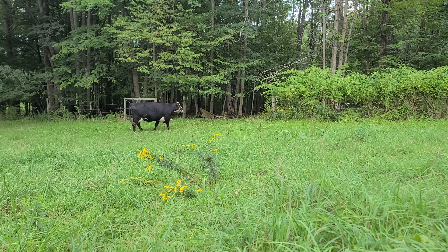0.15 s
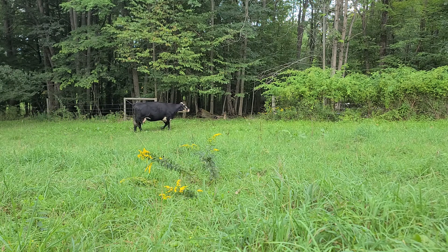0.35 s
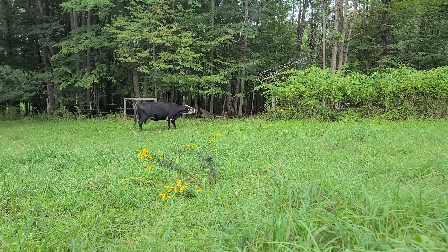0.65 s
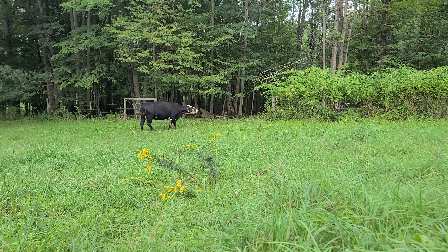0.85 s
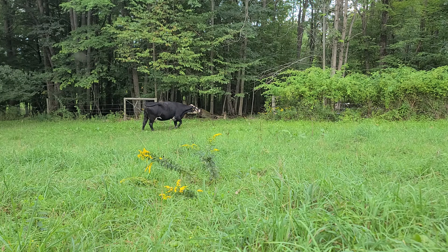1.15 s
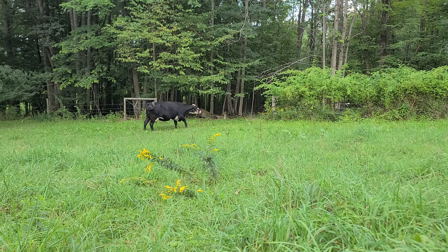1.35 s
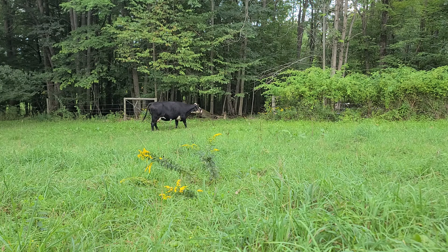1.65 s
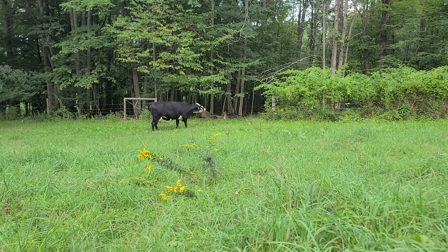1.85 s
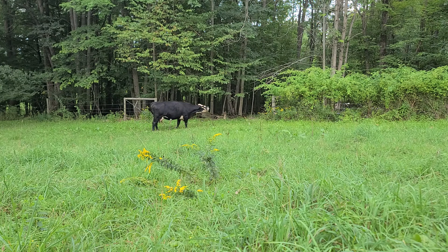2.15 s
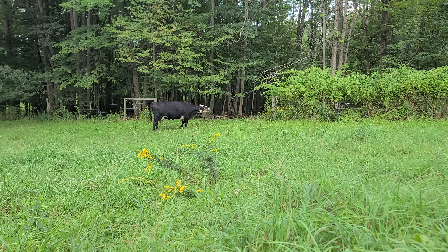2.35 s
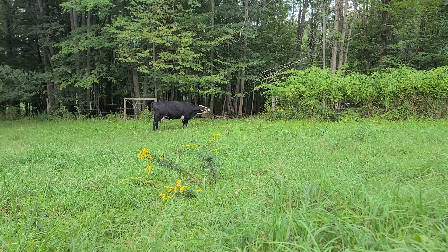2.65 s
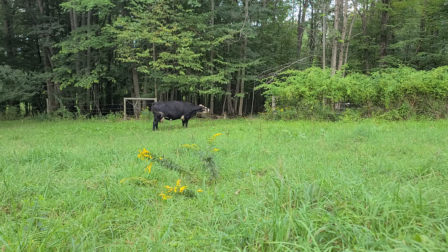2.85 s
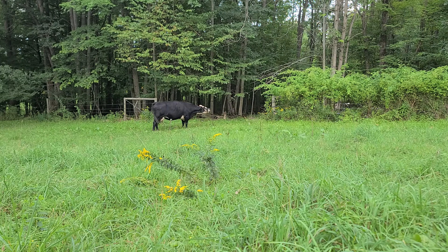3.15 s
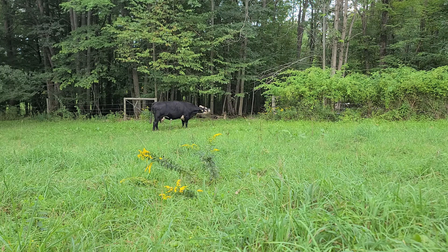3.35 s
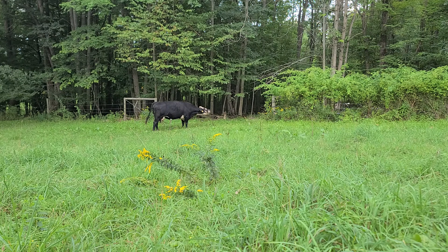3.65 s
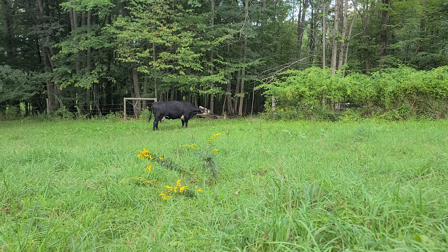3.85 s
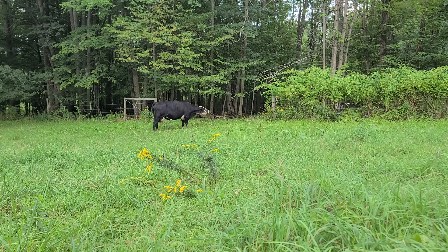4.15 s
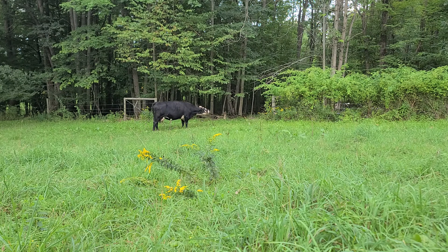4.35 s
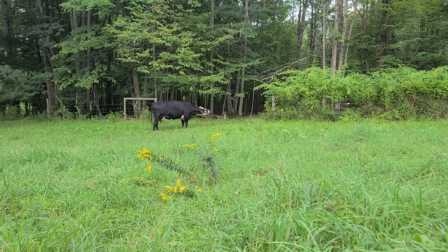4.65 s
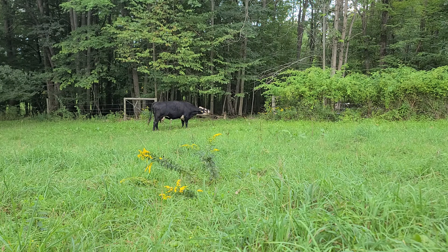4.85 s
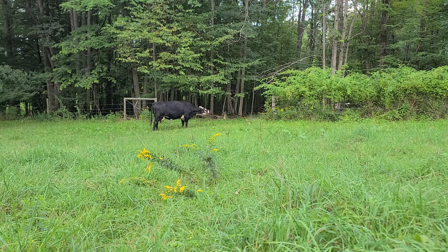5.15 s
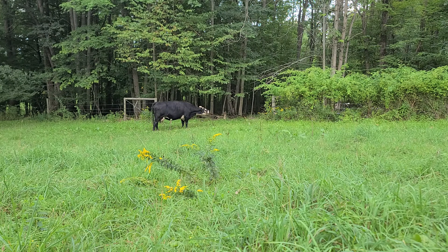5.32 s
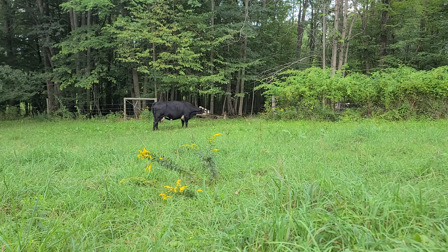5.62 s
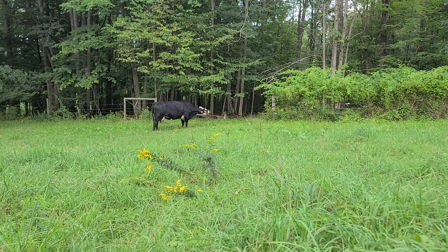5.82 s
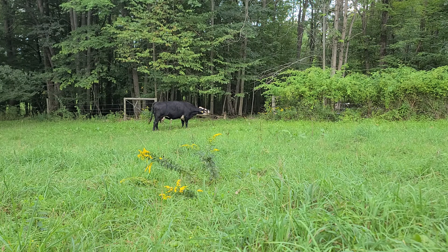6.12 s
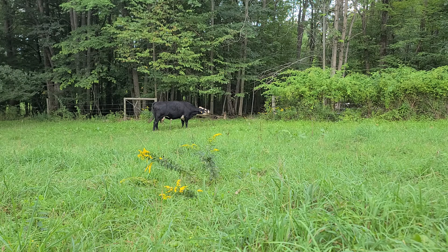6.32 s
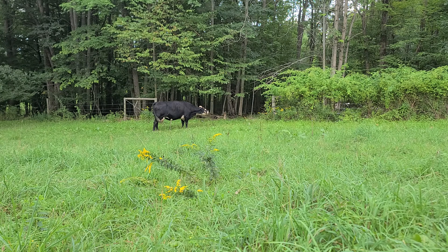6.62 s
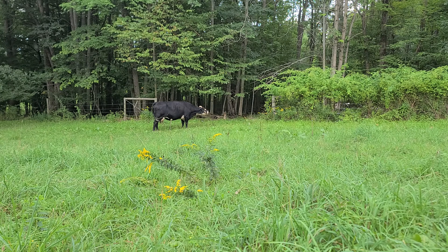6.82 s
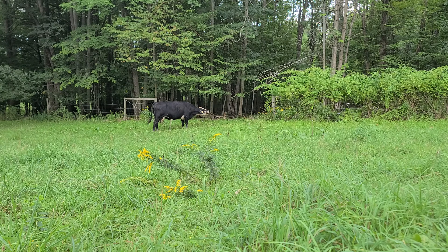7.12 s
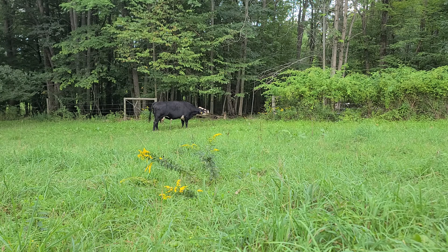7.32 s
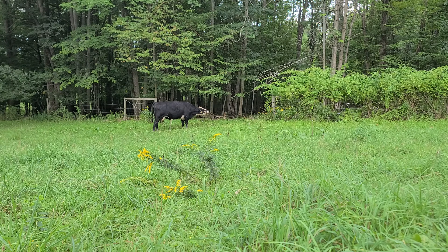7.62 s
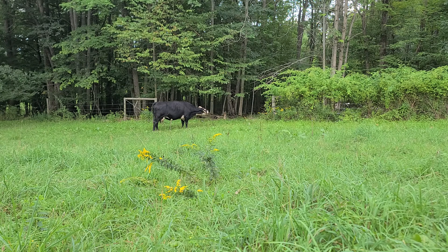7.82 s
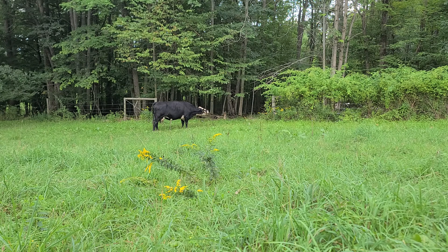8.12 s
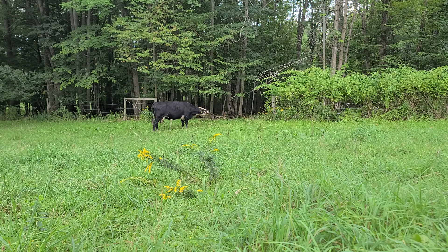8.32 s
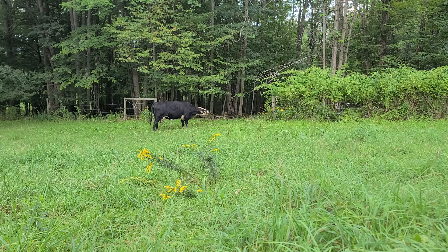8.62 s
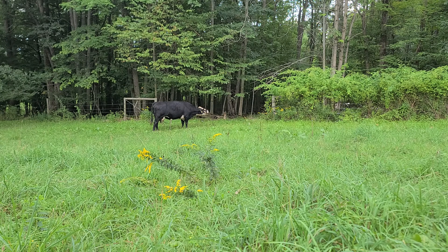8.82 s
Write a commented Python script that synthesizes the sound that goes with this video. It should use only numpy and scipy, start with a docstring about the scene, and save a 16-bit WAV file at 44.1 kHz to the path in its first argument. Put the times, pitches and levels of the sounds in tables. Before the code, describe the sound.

A cow bellows loudly again and again across a pasture, each moo rising then dropping, a second cow answering, woodland echo and insects behind.

```python
"""Pasture at the edge of a wood, stereo microphone: a cow lows from the first moment, seven calls in all.
A second cow, further left, answers across the first call and again from the fifth second.
A thin treble tone wavers twice early on; the trunks scatter every bellow back as a long echo.
A katydid to the right ticks in three bouts from the start; crickets chirp on the same side, louder right.
Far insects, a low murmur of air and wind on the microphone ports lie beneath; all are shaped noise."""
import sys
import numpy as np
from scipy import signal
from scipy.fft import rfft, irfft, next_fast_len
from scipy.io import wavfile
from scipy.ndimage import uniform_filter1d, map_coordinates

SR = 44100
rng = np.random.default_rng(int(sys.argv[2]) if len(sys.argv) > 2 else 0)


def int16_out(signal):
    """Quantize to a 16-bit WAV file."""
    q = np.round(np.clip(np.atleast_2d(signal).T, -1, 1) * 32767)
    wavfile.write(sys.argv[1], SR, q.astype(np.int16))


N = 395577


def amp(db):
    """Gain of a level in dB."""
    return 10 ** (np.asarray(db) / 20)


def unit(x):
    """x at rms 1."""
    return x / np.sqrt(np.mean(x ** 2) + 1e-20)


def along(points, hz):
    """Values at hz, read from (frequency, value) points on a log frequency axis."""
    f, v = np.transpose(points)
    return np.interp(np.log(hz + 1), np.log(f + 1), v)


def played(rows):
    """First sample, then one value per sample for each column while the table lasts."""
    seconds, *columns = np.transpose(rows)
    n = np.arange(round(seconds[0] * SR), min(round(seconds[-1] * SR), N))
    return n[0], [np.interp(n / SR, seconds, column) for column in columns]


def wobble(rate, size, count=1):
    """Smooth random curves with rate knots a second."""
    knots = rng.standard_normal((count, int(size * rate / SR) + 4))
    position = np.arange(size) * rate / SR
    return np.array([map_coordinates(k, [position]) for k in knots])


def filtered(x, response):
    """x times a response of frequency."""
    m = next_fast_len(N + SR)
    hz = np.fft.rfftfreq(m, 1 / SR)
    return irfft(rfft(x, m) * response(hz), m)[..., :N]


def paired(two, alike):
    """Two unrelated signals mixed to a left-right correlation that may vary with frequency."""
    def turn(hz):
        return np.arccos(np.clip(along(alike, hz), -1, 1)) / 2

    mid, side = filtered(two, lambda hz: np.array([np.cos(turn(hz)), np.sin(turn(hz))]))
    return np.array([mid + side, mid - side])


def hiss(spectrum, alike):
    """Stereo noise of rms 1 with a given spectrum and left-right correlation."""
    noise = filtered(rng.standard_normal((2, N)), lambda hz: amp(along(spectrum, hz)))
    return unit(paired(noise, [(100, alike)]))


# Spectrum of the still air over the pasture: (frequency [Hz], relative density [dB per Hz])
AIR_SPECTRUM = [(40, -28.5), (70, -0.5), (120, -8), (240, 4), (420, -8.5), (650, -20), (1300, -25),
                (1700, -16), (2200, -25), (3200, -35.5), (5000, -91.5)]


def air():
    """The open air is a steady low noise, nearly alike at both ports."""
    return amp(-52.0) * hiss(AIR_SPECTRUM, alike=.85)


# Spectrum of the wind on the microphone ports: (frequency [Hz], relative density [dB per Hz])
WIND_SPECTRUM = [(15, -13), (30, -7.5), (50, 1.5), (70, -16), (150, -88.5)]
GUST_DB, GUST_SWING_DB = -72, 5  # middle level; size of the slow swing


def wind():
    """Wind buffets the ports as a deep rumble that swings slowly and, less, quickly."""
    gusts = amp(GUST_DB + GUST_SWING_DB * wobble(2.5, N) + 3 * wobble(7.2, N))
    return gusts * hiss(WIND_SPECTRUM, alike=.96)


# Spectrum of the far insects: (frequency [Hz], relative density [dB per Hz])
CHORUS_SPECTRUM = [(1880, -30.5), (3200, -11.5), (3440, -10), (3750, -5.5), (4490, -13), (5990, 1.5),
                   (6840, -42.5), (7120, -11), (7610, -3), (8460, 7), (10300, -10), (11300, -3.5),
                   (12800, -5), (14000, -11.5), (15700, -18)]


def far_insects():
    """Many distant insects blur into a wide noise that swells a little."""
    return amp(-67.5 + 0.74 * wobble(3.6, N)) * hiss(CHORUS_SPECTRUM, alike=0)


# Chirps of the nearest crickets: (time [s], right-hand peak level before pulse variation [dB], tone [Hz])
CRICKET_CHIRPS = [(0.394, -61, 8500), (0.6165, -57, 9170), (0.937, -55, 8980), (1.076, -62, 8620),
                  (1.3266, -56, 8700), (1.4666, -61, 8630), (1.5965, -60, 8550), (1.8791, -61, 8790),
                  (2.1789, -63, 8150), (2.8504, -60, 8670), (3.6127, -64, 8670), (4.6463, -57, 8740),
                  (4.7482, -55, 8680), (4.8617, -58, 8190), (5.0245, -55, 8780), (5.8438, -64.5, 8800),
                  (6.133, -63, 8300), (6.2736, -64, 8700), (6.4483, -57, 8280), (6.7351, -58, 8300),
                  (7.0369, -60, 8720), (7.125, -57, 8260), (7.3397, -69, 8740), (7.4664, -56, 8370),
                  (7.8462, -57, 8380), (8.27, -60, 8370), (8.5545, -52.5, 8330), (8.822, -56, 8920)]


def crickets():
    """Each chirp is six short pulses on one wing tone, the pulses uneven in level."""
    out = np.zeros(N + SR)
    t = np.arange(round(.06 * SR)) / SR
    pulses = np.sin(np.pi * 100 * t) ** 4  # one every 10 ms
    for s, db, hz in CRICKET_CHIRPS:
        uneven = np.repeat(amp(rng.normal(0, 2, 6)), 441)
        out[round(s * SR):][:len(t)] += amp(db) * pulses * np.sin(2 * np.pi * hz * t) * uneven
    return out[:N] * np.array([[.3], [1]])  # louder on the right


# Katydid bouts, each a list of (time [s], wing strokes [per s], rms level [dB])
KATYDID_BOUTS = [
    [(0, 36.6, -58.5), (.8, 36.6, -57.5), (1.3, 36.2, -58), (1.675, 35.8, -57)],
    [(2.3635, 37.9, -58.5), (2.7, 37.8, -58), (3.4, 37.2, -59.5), (4, 36.6, -57), (5, 36.5, -57.5),
     (5.83, 31, -60)],
    [(6.4325, 37.9, -58), (6.8, 37.8, -58), (7.2, 35, -58.5), (7.8, 36.7, -59), (8.97, 36.6, -57)],
]
# Lone ticks: (time [s], level before a 2.5 dB lift [dB])
LONE_TICKS = [(1.8771, -48.5), (1.8976, -50.5), (2.2995, -53.5), (2.3123, -52), (6.0783, -49.5),
              (6.1049, -53), (6.563, -44.5)]
# Spectrum of the wing noise: (frequency [Hz], relative density [dB per Hz])
WING_SPECTRUM = [(6470, -41.5), (11000, -14.5), (11900, -3.5), (12900, 5), (13700, 3), (15100, 2),
                 (15700, -26.5)]


def katydid():
    """Each wing stroke is a soft buzz of noise that ends in a sharp tick."""
    envelope = np.zeros(N)
    for rows in KATYDID_BOUTS:
        start, (rate, db) = played(rows)
        size = len(db)
        cycle = (np.cumsum(rate) / SR + .7) % 1
        tick = np.exp(-((cycle - .9) / .04) ** 2)
        tick = tick * amp(1.5 * wobble(30, size)[0])
        buzz = .17 + .1 * np.sin(np.pi * np.clip(cycle / .9, 0, 1)) ** 2
        envelope[start:start + size] = amp(db) * unit(tick + buzz)
    for s, db in LONE_TICKS:
        envelope += amp(db + 2.5) * np.exp(-((np.arange(N) / SR - s) / .001) ** 2)
    sound = envelope * hiss(WING_SPECTRUM, alike=.85)
    late = np.array([[3.3e-4], [0]])  # s; it reaches the left port later, so it sits to the right
    return filtered(sound, lambda hz: np.exp(-2j * np.pi * hz * late))


# Decay of the trunks' echo: (frequency [Hz], time to fall 60 dB [s])
WOOD_DECAY = [(150, 1.51), (500, 0.64), (900, 1.56), (1500, 0.61), (3000, 0.55), (8000, 0.65)]
# Strength of the echo: (frequency [Hz], level re direct sound [dB])
WOOD_LEVEL = [(100, -14), (300, -12), (600, -7.5), (1000, -1), (3000, -1.5), (6000, -5)]
# Left-right likeness of the echo: (frequency [Hz], correlation [0 to 1])
WOOD_LIKENESS = [(150, .5), (500, .2), (1000, 0), (4000, 0)]


def wood(x):
    """Trunks at many distances scatter the sound; each frequency dies at its own speed."""
    hz, t, grains = signal.stft(rng.standard_normal((2, 2 * SR)), SR, nperseg=256)
    decay = amp(-60 * t / along(WOOD_DECAY, hz)[:, None])
    fall = decay * (1 - np.exp(-t / .015))  # the echo builds up over some 15 ms
    fall /= np.linalg.norm(fall, axis=1, keepdims=True)
    tail = signal.istft(grains * fall, SR, nperseg=256)[1]
    tail = tail / np.linalg.norm(tail[0])
    scattered = signal.fftconvolve(x[None], tail, axes=1)[:, :N]
    echo = paired(scattered, WOOD_LIKENESS)
    return filtered(echo, lambda hz: amp(along(WOOD_LEVEL, hz)))


# Thin treble tone, each sounding a list of (time [s], middle pitch [Hz], level before flutter and chop [dB])
WHISTLE_TONES = [
    [(.425, 4170, -81.5), (.48, 4350, -71.5), (.57, 4400, -68), (.62, 4350, -78.5)],
    [(1.03, 3900, -63.5), (1.156, 4000, -60.5), (1.168, 3980, -74.5), (1.176, 3930, -63.5),
     (1.24, 4000, -79.5)],
]


def whistle():
    """A narrow tone unsteady in pitch and level, lightly chopped about 135 times a second."""
    out = np.zeros(N)
    for rows in WHISTLE_TONES:
        start, (hz, db) = played(rows)
        size = len(hz)
        chop_hz = 135 + 15 * wobble(7.2, size)[0]
        chop = 1 + 0.43 * np.cos(2 * np.pi * np.cumsum(chop_hz) / SR)
        tone = np.sin(2 * np.pi * np.cumsum(hz + 60 * wobble(85, size)[0]) / SR)
        flutter = amp(2.5 * wobble(25, size)[0]) * signal.windows.tukey(size, .2)
        out[start:start + size] = amp(db) * flutter * chop * tone
    return out


# Calls of the first cow and of the second, each call a list of
# (time [s], pitch [Hz], reference level [dB], mouth opening [0 shut, 1 open, more gaping])
COW_CALLS = [
    [(.08, 68.1, -59, .1), (.13, 71.03, -41.5, 0), (.288, 86.9, -30.5, 0.38), (.33, 111.5, -30, 0),
     (.4, 112, -30, 0.14), (.52, 127.5, -28.5, 0.21), (.55, 135.3, -26, 0.97), (.63, 150.9, -22.5, 1.13),
     (.788, 165.7, -21, 1.046), (.97, 171.7, -18, 0.93), (1.01, 160.6, -16.5, 1.14),
     (1.044, 123.7, -25, 1.5), (1.08, 77.8, -41, 1.3)],
    [(1.7, 66.37, -40.5, 1), (1.774, 89.93, -29, 1), (1.822, 104, -26, 1), (1.938, 129.3, -25, .9),
     (2.02, 148.6, -23, 1.18), (2.13, 159.6, -23, 1.045), (2.27, 169.2, -18, 0.93),
     (2.344, 177.6, -22, 1.12), (2.45, 183.2, -19, 1.045), (2.6, 186.3, -18.5, 0.98),
     (2.636, 172.3, -17, 1.28), (2.69, 87.1, -34.5, 2)],
    [(3.04, 77.4, -48.5, .6), (3.102, 109.2, -31.5, 1.1), (3.174, 140, -22, 0.89),
     (3.238, 151.1, -24, 1.044), (3.428, 169, -18.5, 0.95), (3.55, 178.5, -19, 1.02),
     (3.66, 183.1, -18.5, 0.99), (3.75, 184, -18.5, .9), (3.84, 179.7, -19.5, 1), (3.876, 177, -19.5, 1.37),
     (3.9, 152.1, -18.5, 1.44), (3.955, 88.8, -35, 1.7)],
    [(4.27, 79.1, -58.5, 0.9), (4.322, 102.4, -30.5, 1), (4.402, 139, -23, 0.91), (4.488, 155, -22, 0.88),
     (4.618, 171, -18.5, 0.97), (4.74, 178.6, -18.5, 1.06), (4.858, 184.1, -18, 1),
     (4.92, 184.1, -16.5, 0.91), (4.995, 180, -18, 1.08), (5.018, 175.4, -21.5, 1.39),
     (5.042, 151.3, -17, 1.24), (5.095, 91, -34.5, 1.6)],
    [(5.49, 73, -51.5, 1.1), (5.53, 87.1, -33, 0.97), (5.596, 112.8, -30, 1), (5.67, 132.2, -24, 0.95),
     (5.874, 159.3, -21.5, 0.92), (5.948, 163.8, -22.5, 1.106), (6.02, 173.2, -18, 0.97),
     (6.274, 176.6, -17.5, 1.036), (6.304, 171.5, -16.5, 0.89), (6.334, 158, -20, 0.98),
     (6.41, 91, -31.5, 1.8)],
    [(6.85, 70.2, -45, 0.89), (6.888, 89.8, -33, 1), (6.936, 108.9, -29.5, 0.97), (7.018, 135.3, -24, 0.95),
     (7.09, 147.6, -24, 0.93), (7.3, 169.1, -20.5, 1.04), (7.364, 177.8, -17.5, 1.06),
     (7.53, 173.6, -18.5, 0.97), (7.552, 166.9, -20.5, 1.2), (7.584, 136.6, -20.5, 1.2),
     (7.64, 77.7, -42.5, 2)],
    [(7.985, 71.9, -46, 1.1), (8.036, 97.45, -30, 1), (8.106, 125.6, -26, .9), (8.194, 139.9, -22.5, 0.87),
     (8.296, 155, -22.5, 0.97), (8.426, 164.9, -20.5, 0.99), (8.5, 175.4, -18, 1.02),
     (8.612, 177.2, -19, 1.15), (8.722, 175, -18, 1.01), (8.775, 157.4, -19.5, 1.06),
     (8.855, 83.4, -33, 1.5)],
]
ANSWER_CALLS = [
    [(.44, 63.14, -40.5, .3), (.59, 86.3, -35.5, .9), (.7, 110.3, -30, .9), (.8, 138.1, -29.5, 0.97),
     (.88, 148.4, -25.5, 0.84), (1.0, 155.9, -32, 1), (1.09, 162.1, -24, 1), (1.16, 174.6, -22.5, 1),
     (1.24, 177.1, -24.5, 1), (1.4, 180.5, -22, 1), (1.58, 181.7, -20.5, 0.89), (1.72, 180.6, -22, 1),
     (1.766, 158, -21, 1), (1.85, 93.1, -39.5, 1)],
    [(4.84, 68, -60, 0.28), (4.94, 84.6, -43.5, 0.43), (5.1, 88.64, -47, 0.71), (5.2, 108.8, -38, 0.98),
     (5.3, 133.3, -32.5, 0.53), (5.4, 157.4, -30.5, 0.47), (5.6, 186.4, -27.5, 0.64),
     (5.7, 190.5, -24, 0.73), (5.95, 194.7, -23.5, 0.35), (6.3, 191.8, -24.5, 0.36), (6.38, 181, -20, 0.55),
     (6.48, 102.3, -40.5, 0.82)],
]
# Throat resonances that colour the high partials: (frequency [Hz], relative gain [dB])
COW_THROAT = [(300, -16), (600, -5), (720, -0.5), (880, 4.5), (1090, 4), (1230, -5.5), (1400, -2.5),
              (1600, -12), (1850, -6.5), (2080, -26), (2400, -15.5), (2900, -20), (3150, -51.5),
              (4000, -49.5), (4600, -47), (5300, -56.5), (7000, -100)]
ANSWER_THROAT_GAIN = [(350, -43), (600, -10), (709, -14.5), (1100, 1), (1280, -8), (1490, -10),
                      (1690, -15.5), (2040, -21.5), (2390, -28), (2740, -34), (3240, -48.5), (4160, -44),
                      (5500, -57), (7150, -85), (12100, -120)]
# What the open mouth does to the four lowest partials: (frequency [Hz], gain [dB])
COW_MOUTH = [(70, -4.5), (106, -7), (121, -20.5), (136, -14.5), (150, -8), (180, 0.16), (215, 3),
             (265, 3.6), (300, -2.5), (330, -3), (355, -0.23), (400, -1.5), (440, -4), (500, 3), (524, -4),
             (548, -6.5), (600, -12), (660, -23.5), (730, -23.5)]
ANSWER_MOUTH_GAIN = [(70, -6), (110, -17), (140, -11), (165, -2.5), (190, 0.5), (225, 7.5), (280, 5.5),
                     (320, -8.5), (360, -0.5), (440, -4.5), (490, 4.5), (545, -3.5), (600, -17.5),
                     (730, -19.5)]
# Partials 1 to 4: (level re reference before the mouth's gain [dB], loss with the mouth shut [dB])
COW_LOW = [(1, -1.5), (-1.5, 9.5), (-3, 12.5), (-8.5, 12)]
ANSWER_LOW_PARTIALS = [(1, 0.5), (-4.5, 7), (-3.5, 41.5), (-9.5, 31)]
# Throat bands against pitch, before a common 0.5 dB lift:
# (pitch [Hz], low band re reference [dB], middle band [dB], top band [dB])
COW_BRIGHT = [(80, -12.5, -24.5, -51), (100.1, -17, -33.5, -60.5), (129, -20, -52.5, -61.5),
              (156.7, -16.5, -31.5, -59), (166.5, -15, -26, -52.5), (177.2, -19, -33.5, -59.5),
              (187, -21, -34, -53)]
ANSWER_BRIGHTNESS = [(80, -15.5, -35, -54), (137, -21, -38, -60), (160, -15.5, -24.5, -52.5),
                     (188, -15, -33.5, -54), (195, -15, -32, -51.5)]
# Edges of the three throat bands: (from [Hz], to [Hz])
THROAT_BANDS = [(0, 1650), (1650, 3250), (3250, 6000)]
# Loss of each throat band with the mouth shut: low, middle, top [dB]
BAND_SHUT_LOSS = [30.5, 30.5, 19.5]
RASP = 0.2  # weight of breath noise in the throat
WAVER_DB, FLICKER_DB = 3.8, 2.5  # slower and quicker unevenness of the high partials
HELD_SHARE = .55  # share of the unevenness on a held pitch
ROUGH_HZ_PER_S = 120  # glide that adds a share of 1, up to 1.2 in all


def bellow(calls, colour, mouth, lows, bright):
    """Vocal folds give nearly steady partials; the throat colours the high ones, air rasps once a cycle."""
    out = np.zeros(N)
    step = 64  # samples between gain values of the high partials
    rasp = unit(filtered(rng.standard_normal(N), lambda hz: amp(along(colour, hz))))
    for rows in calls:
        start, (pitch, level_db, opening) = played(rows)
        size = len(pitch)
        at_hz, *bright_db = np.transpose(bright)
        bands_db = [level_db + np.interp(pitch, at_hz, db) + lost_db * (opening - 1)
                    for db, lost_db in zip(bright_db, BAND_SHUT_LOSS)]
        jitter = 1 + .0022 * wobble(40, size)[0]
        phase = 2 * np.pi * np.cumsum(pitch * jitter) / SR
        glide = np.abs(np.gradient(pitch) * SR)  # Hz per s
        # the mouth is partly shut while the pitch swoops: 1 dB for every 70 Hz per s
        closing = amp(-uniform_filter1d(glide, size=1024) / 70)

        k = np.arange(5, 40)[:, None]  # numbers of the high partials
        hz = k * pitch[::step]
        throat = amp(along(colour, hz))
        gains = 0
        for (lo, hi), db in zip(THROAT_BANDS, bands_db):
            part = throat * (hz >= lo) * (hz < hi)
            part_rms = np.sqrt(np.sum(part ** 2, axis=0) + 1e-12)
            gains = gains + amp(db[::step] + 0.5) * part / part_rms
        smooth_glide = uniform_filter1d(glide, size=4096)[::step]
        rough = np.clip(HELD_SHARE + smooth_glide / ROUGH_HZ_PER_S, 0, 1.2)
        # each partial wavers by itself; knot rates count in steps
        gains *= amp(rough * WAVER_DB * wobble(17 * step, hz.shape[1], count=len(k)))
        gains *= amp(rough * FLICKER_DB * wobble(45 * step, hz.shape[1], count=len(k)))
        gains = np.repeat(gains, step, axis=1)[:, :size]
        gains = uniform_filter1d(gains, size=4 * step, axis=1)
        high = np.sum(gains * np.cos(k * phase - 0.079 * k ** 2), axis=0)

        puffs = 1 + np.cos(phase)
        breath_gain = RASP * np.repeat(rough, step)[:size] * amp(bands_db[0])
        breath = breath_gain * puffs * rasp[start:start + size]

        share = np.clip(opening, 0, 1)
        low = 0
        for j, (db, lost_db) in enumerate(lows, 1):
            partial_db = level_db + db + share * along(mouth, j * pitch) - (1 - share) * lost_db
            low = low + amp(partial_db) * np.cos(j * phase)
        shimmer = 1 + 0.051 * wobble(150, size)[0]  # cycles differ a little in size
        n = np.arange(size)
        edge = np.clip(np.minimum(n / 3, n[::-1]) / (.012 * SR), 0, 1)  # 36 ms in, 12 ms out
        out[start:start + size] += edge * np.sqrt(2) * (shimmer * low + closing * (high + breath))
    return out


def scene():
    """Both cows and their echo over the insects, air and wind; the second cow stands further left."""
    near = bellow(COW_CALLS, COW_THROAT, COW_MOUTH, COW_LOW, COW_BRIGHT) + whistle()
    other = bellow(ANSWER_CALLS, ANSWER_THROAT_GAIN, ANSWER_MOUTH_GAIN,
                   ANSWER_LOW_PARTIALS, ANSWER_BRIGHTNESS)
    late = np.array([[0], [2.3e-4]])  # s; the second cow reaches the right port later
    direct = near + filtered(other, lambda hz: np.exp(-2j * np.pi * hz * late))
    background = air() + wind() + far_insects()
    return background + crickets() + katydid() + wood(near + other) + direct


# Spectrum of the microphone's treble hiss: (frequency [Hz], relative density [dB per Hz])
CAPSULE_SPECTRUM = [(3000, -120), (3500, -26.5), (5800, -7.5), (6300, -41), (7200, -23), (8000, -7),
                    (10500, -6), (13000, -3.5), (16000, -9)]
# Difference of the two ports: (frequency [Hz], left minus right [dB])
PORT_DIFFERENCE = [(100, -1), (200, -1), (380, 1), (700, -1), (1300, 2), (2400, 0), (4400, 1.5), (8100, -2),
                   (15000, 1.5)]
TOP_HZ = 15886  # band limit


def record(dry):
    """The ports differ a little; a treble hiss rises with loud sound; nothing stays above the band limit."""
    loud = np.sqrt(np.abs(uniform_filter1d(dry.mean(axis=0) ** 2, size=2048)))
    wet = dry + amp(-43.0) * loud * hiss(CAPSULE_SPECTRUM, alike=0)
    sides = np.array([[1], [-1]])

    def ports(hz):
        lead = np.exp(2j * np.pi * hz * 2.2e-5 * sides)  # left 22 us early, right 22 us late
        return amp(along(PORT_DIFFERENCE, hz) / 2 * sides) * lead * (hz < TOP_HZ)

    return filtered(wet, ports)


dry = scene()
out = record(dry)
int16_out(out)
```